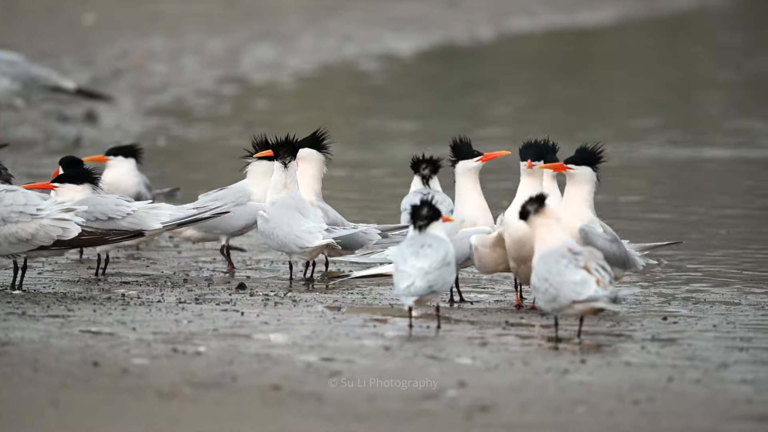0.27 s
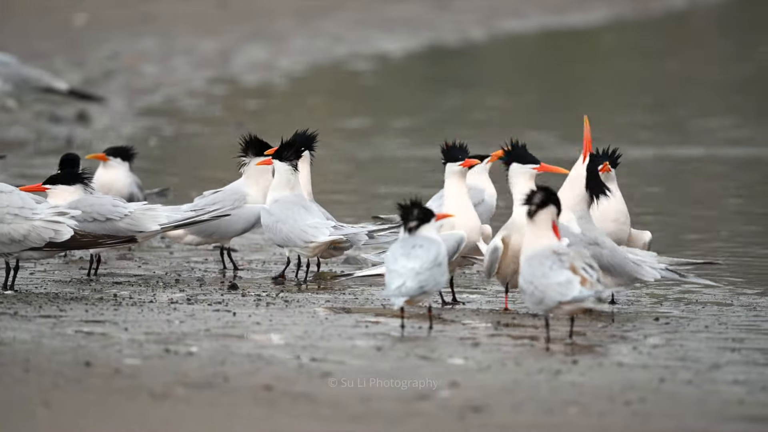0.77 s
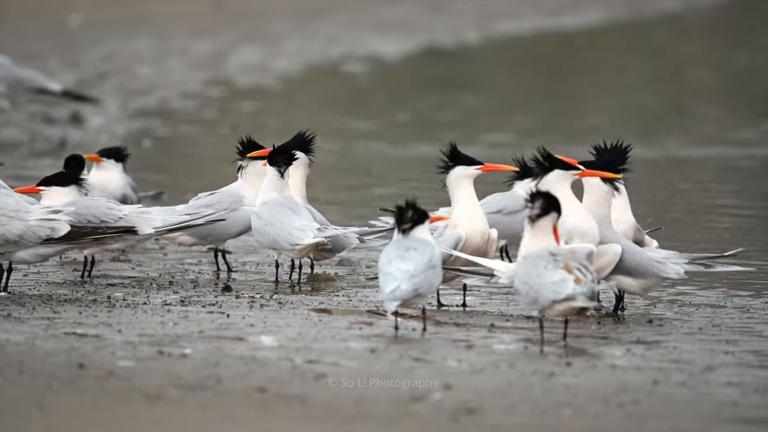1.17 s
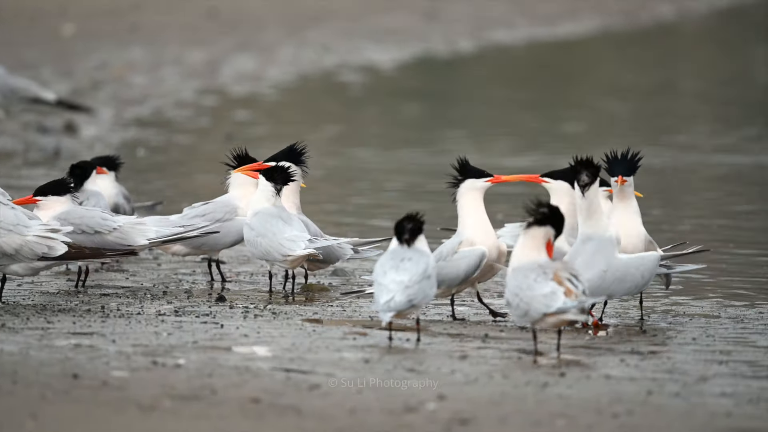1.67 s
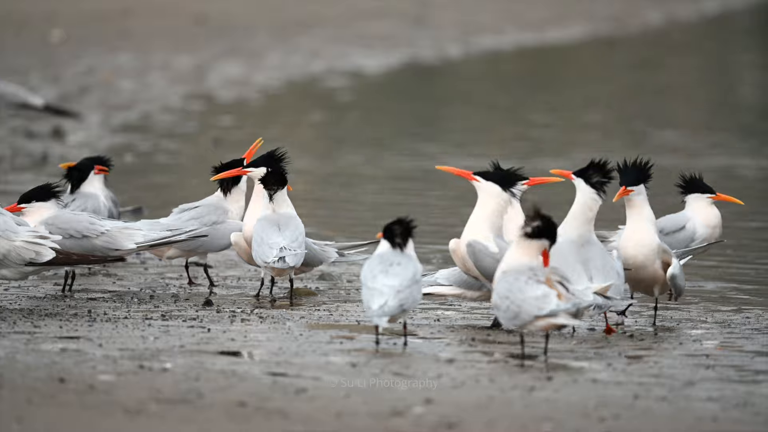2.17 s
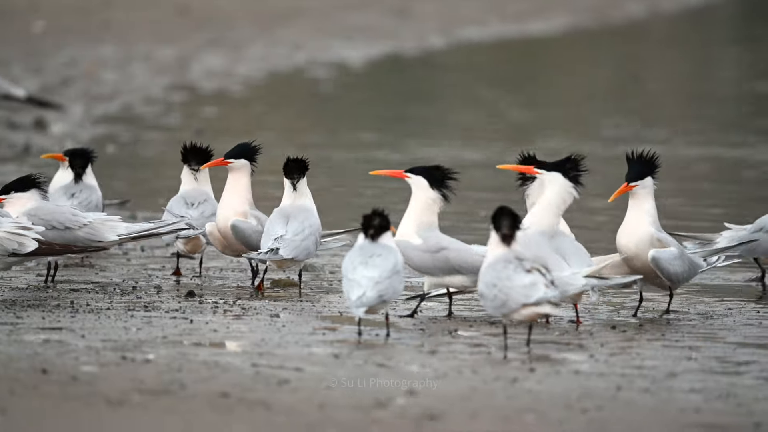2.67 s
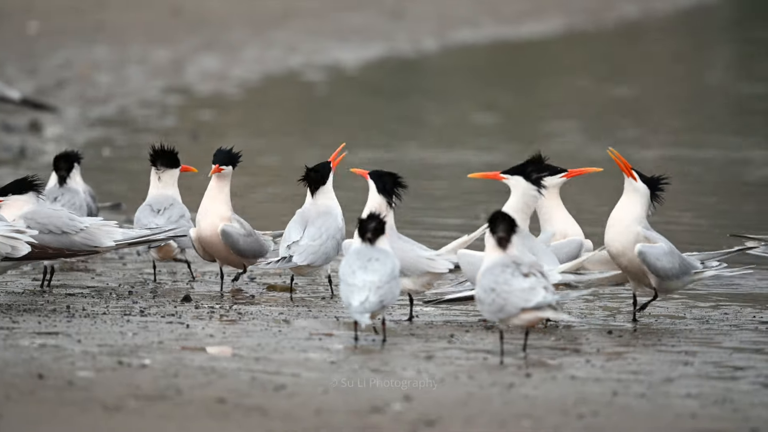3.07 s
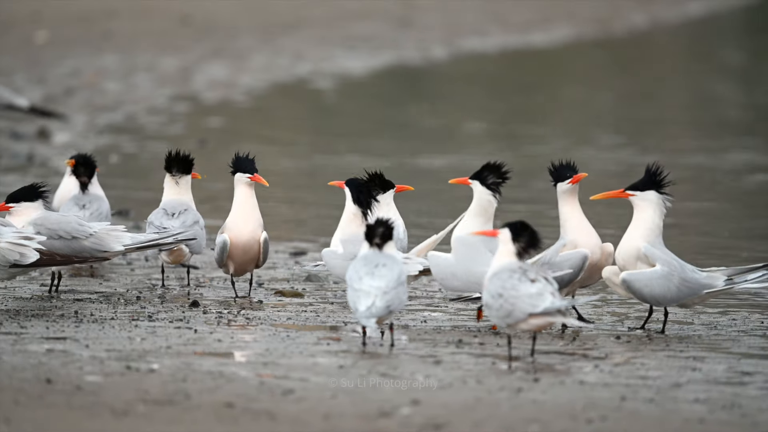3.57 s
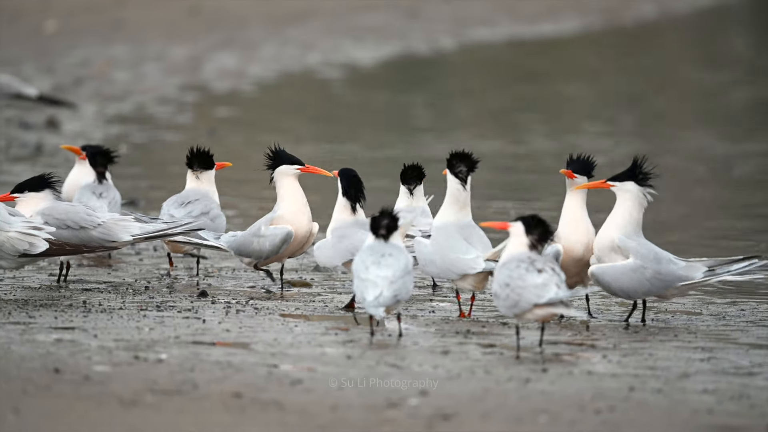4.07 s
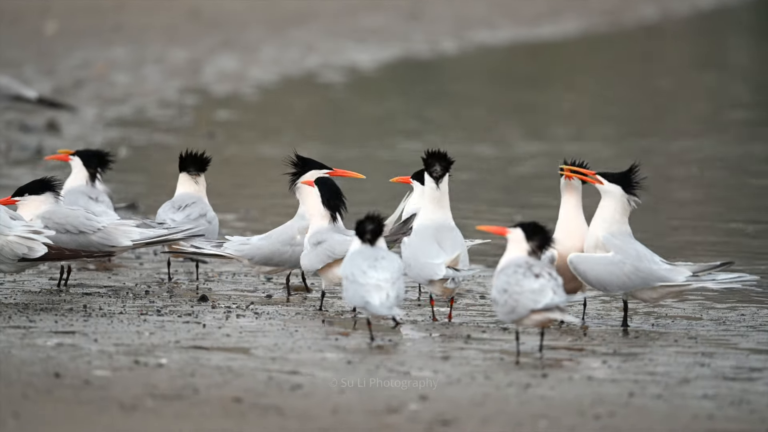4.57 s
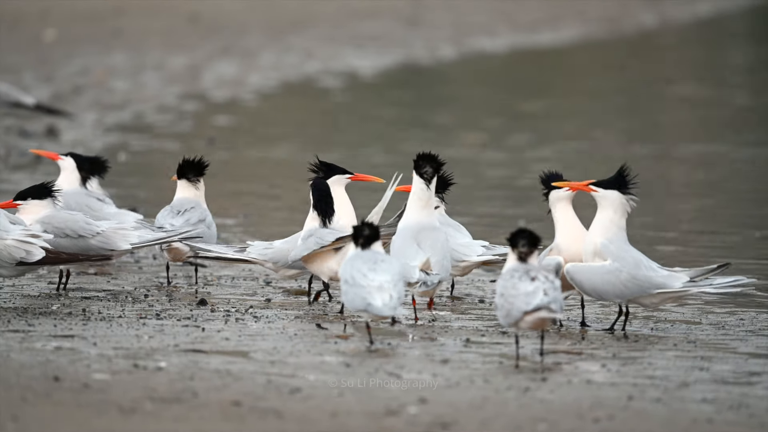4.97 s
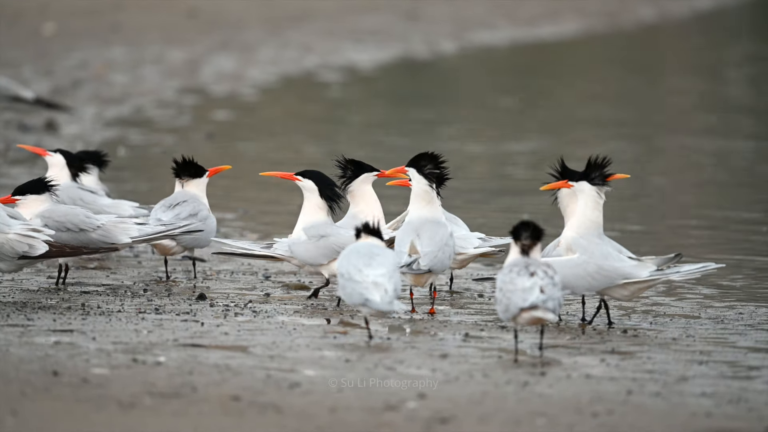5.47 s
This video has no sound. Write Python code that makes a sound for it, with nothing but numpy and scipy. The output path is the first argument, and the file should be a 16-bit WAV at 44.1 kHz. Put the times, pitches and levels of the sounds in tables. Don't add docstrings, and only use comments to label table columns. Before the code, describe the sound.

A flock of terns on an open mud flat calls in overlapping reedy notes and fast grating rattles, over faint surf and light wind.

```python
import sys
import numpy as np
from scipy import signal
from scipy.fft import rfft, irfft, next_fast_len
from scipy.io import wavfile
from scipy.ndimage import uniform_filter1d, map_coordinates

SR = 44100
rng = np.random.default_rng(int(sys.argv[2]) if len(sys.argv) > 2 else 0)


def dump(signal):
    limited = np.clip(np.atleast_2d(signal).T, -1, 1)
    pcm = np.round(limited * 32767).astype(np.int16)
    wavfile.write(sys.argv[1], SR, pcm)


def gain_from_db(level_db):
    decades = np.asarray(level_db, float) / 20
    return 10 ** decades


N = 252252


def unit(x):
    return x / np.sqrt(np.mean(x ** 2) + 1e-20)


def along(points, hz):
    f, v = np.transpose(points)
    return np.interp(np.log(hz + 1), np.log(f + 1), v)


def wobble(rate_hz, size=N):
    knots = rng.standard_normal(int(size * rate_hz / SR) + 4)
    return map_coordinates(knots, [np.arange(size) * rate_hz / SR])


def filtered(x, response):
    m = next_fast_len(N + 8192)
    return irfft(rfft(x, m) * response(np.fft.rfftfreq(m, 1 / SR)), m)[..., :N]


def coloured(spectrum):
    return unit(filtered(rng.standard_normal(N), lambda hz: gain_from_db(along(spectrum, hz))))


def add(track, start_s, sound):
    part = track[round(start_s * SR):][:len(sound)]
    part += sound[:len(part)]


def swell(t, length_s, rise_s, fall_s):
    nearest_end = np.minimum(t / rise_s, (length_s - t) / fall_s)
    return np.sin(np.pi / 2 * np.clip(nearest_end, 0, 1)) ** 2


# Hz, left minus right in dB.
SHADE_DB = [(700, 1.5), (1400, 0.5), (2700, 1.5), (3400, -9), (4100, -8), (5000, -3.5), (6900, 5.5),
            (9500, 0.5)]
# Hz, left lead in radians.
TURN_RAD = [(700, 0), (1400, -.5), (2200, -.9), (3400, -1.9), (4100, .4), (6000, .2), (9000, -.3),
            (13000, .5)]


def ports(x, lead_ms):
    def half(hz):
        phase = along(TURN_RAD, hz) - 2 * np.pi * hz * lead_ms / 1000
        return gain_from_db(along(SHADE_DB, hz) / 2) * np.exp(.5j * phase)
    return filtered(x, lambda hz: np.array([half(hz), 1 / half(hz)]))


def syrinx(pitch_hz, tones_db, loss_db, jitter, flutter_db):
    k = np.arange(1, 17)[:, None]
    kin = np.where(k < 8, k, 6 + k % 2)
    level = np.take(tones_db, kin - 1) - loss_db * (k - kin)
    hz = pitch_hz * (1 + jitter * wobble(406, size=len(pitch_hz)))
    slack_db = 2
    level = level - slack_db * k * (1 - pitch_hz / pitch_hz.max())
    phase = 2 * np.pi * np.cumsum(hz) / SR
    drift = wobble(89.75, size=k.size * len(hz)).reshape(k.size, -1)
    flutter = flutter_db * np.minimum(k / 5, 1.2) * drift
    scatter_db = rng.normal(0, .3 + k ** 2 / 40)
    each = gain_from_db(level + scatter_db + flutter) * (k * hz < 15800)
    return np.sqrt(2) * (each * np.sin(k * phase + k * k)).sum(0)


# Hz, dB.
BEAK_DB = [(5200, 0.74), (6100, -6.5), (8500, -7), (15500, -13)]
# centre in Hz, width in Hz, gain in dB.
THROAT_PEAKS = [(2180, 395, 3.5), (4750, 230, 2.5)]


def throat_and_air(calls):
    def gain_db(hz):
        peaks = sum(db * np.exp(-((hz - c) / w) ** 2) for c, w, db in THROAT_PEAKS)
        return along(BEAK_DB, hz) + peaks - 3
    return filtered(calls, lambda hz: gain_from_db(gain_db(hz)))


# Hz, level in dB per Hz.
SURF_DB = [(120, -12), (200, -7), (322, -5), (394, -13), (601, -14.5), (696, -19), (763, -17.5), (933, -15),
           (1350, -25.5), (2960, -35.5), (16000, -63.5)]
# Hz, correlation from -1 to 1.
SURF_LIKENESS = [(200, 1), (700, 0.83), (2000, 0.25), (3000, -0.79), (8000, -0.31)]


def surf():
    z = signal.stft(rng.standard_normal((2, N)), nperseg=512)[2]
    field = uniform_filter1d(rng.standard_normal(z.shape[1:]), size=6, axis=0)
    field = uniform_filter1d(field, size=14, axis=1)
    pair = signal.istft(z * gain_from_db(1.2 * unit(field)), nperseg=512)[1][:, :N]

    def mid_side(hz):
        turn = np.arccos(np.clip(along(SURF_LIKENESS, hz), -1, 1)) / 2
        return gain_from_db(along(SURF_DB, hz)) * (hz > 150) * [np.cos(turn), np.sin(turn)]
    mid, side = filtered(pair, mid_side)
    return unit(np.array([mid + side, mid - side]))


# Hz, level in dB per Hz.
BUFFET_DB = [(12, -63), (20, -6), (65, 6), (128, 6.5), (296, -7), (431, -15), (500, -51), (650, -32),
             (1100, -120)]
# start in seconds, peak in dB.
WIND_PUFFS = [(0.38, -21), (3.944, -21.5), (4.057, -17.5), (4.144, -17), (4.158, -22), (4.212, -14.5),
              (4.893, -15), (5.471, -15), (5.631, -9)]


def wind():
    left = unit(coloured(BUFFET_DB) * gain_from_db(1.68 * wobble(25.068)))
    u = np.arange(-400, 400) / SR / .0016
    pulse = (1 - u * u) * np.exp(-u * u / 2)
    for start_s, db in WIND_PUFFS:
        add(left, start_s, -gain_from_db(db + 32.5) * pulse)
    right = gain_from_db(-8.5) * unit(coloured(BUFFET_DB) * gain_from_db(2.4 * wobble(26.0))) + 0.11 * left
    return np.array([left, right])


# time in seconds, buffet in dB, surf in dB.
WEATHER = [
    (0.0, -25, -39),
    (0.29, -31.5, -40),
    (3.6, -34, -42),
    (4.17, -30.5, -43),
    (4.83, -38, -42),
    (4.87, -32.5, -43),
    (5.72, -39, -42),
]


def air():
    s, buffet_db, surf_db = np.transpose(WEATHER)
    t = np.arange(N) / SR
    return gain_from_db(np.interp(t, s, surf_db) + 4.5) * surf() + gain_from_db(np.interp(t, s, buffet_db) + 2.5) * wind()


# Hz, level in dB per Hz.
BREATH_DB = [(3000, -25), (6800, -14), (8400, 4), (9600, -7), (11000, -12), (16000, -33)]
# Hz, level in dB per Hz.
TOP_AIR_DB = [(6000, -27), (10000, -2.5), (13000, -3), (16000, -9)]
# crest in dB, top air in dB, list of puff starts in seconds.
HISS_RUNS = [
    (-45.5, -2, [0.002, 0.017, 0.085, 0.1]),
    (-43.5, -2, [0.632, 0.661, 0.684, 0.706, 0.724, 0.742, 0.757, 0.771, 0.785, 0.802, 0.818, 0.836, 0.854, 0.872]),
    (-51, -3.5, [3.184, 3.213, 3.236, 3.256, 3.277, 3.298, 3.319, 3.339, 3.358, 3.376, 3.393, 3.41, 3.428]),
    (-51, -7, [4.737, 4.763, 4.787, 4.808, 4.826, 4.845, 4.862, 4.879, 4.896, 4.914, 4.931, 4.949, 4.969]),
]


def hiss():
    puff_s, crest_share, rise_db = 0.015, 0.35, 1.5
    out, t = np.zeros(N), np.arange(round(puff_s * SR)) / SR
    breath, top = coloured(BREATH_DB), coloured(TOP_AIR_DB)
    for db, top_db, starts in HISS_RUNS:
        air_now = gain_from_db(-4.5) * breath + gain_from_db(top_db) * top
        for s, u in zip(starts, np.linspace(0, 1, len(starts))):
            level = db - rise_db * abs(u - crest_share) / crest_share + rng.normal(0, 2.6)
            puff = swell(t, puff_s, rise_s=0.0027, fall_s=0.0087) * air_now[round(s * SR):][:len(t)]
            add(out, max(s - .001, 0), gain_from_db(level) * puff)
    return ports(out, lead_ms=0.023)


# Hz, dB.
RASP_DB = [(600, -38), (1500, 2), (2200, 10.5), (3200, -6.5), (4400, 5.5), (6500, -8), (12000, -17),
           (16000, -58)]


def rattles(chips, length_s):
    out, rasp = np.zeros(N), coloured(RASP_DB)
    t = np.arange(round((length_s + .004) * SR)) / SR
    base_db = np.array([-13, -1.0, -11.5, -7, -17.5, -23.0, -36])
    upper_share = np.array([0.15, 0.27, 0.53, 1.0, 0.86, 1.0, 0.35])
    for s, hz, db, upper_db in chips:
        path = hz * (.97 + 0.055 * t / t[-1])
        voice = syrinx(path, base_db + upper_db * upper_share, loss_db=1.5, jitter=0.024, flutter_db=3.0)
        breath = gain_from_db(-9 + .4 * upper_db) * rasp[round(s * SR):][:len(t)]
        shape = swell(t, t[-1], rise_s=0.0018, fall_s=0.005)
        add(out, max(s - .0015, 0), gain_from_db(db) * shape * (voice + breath))
    return ports(out, lead_ms=0.0038)


def trains(rows, ones, bill):
    length_s, upper_db, loss_db = bill
    quicken = 0.84
    climb, uneven_db, uneven_pitch = 0.012, 2.5, 0.017
    chips = []
    for first, last, n, hz, db in rows:
        for k in range(round(n)):
            s = first + (last - first) * (k / (round(n) - 1)) ** quicken
            chips.append((s, hz * (1 + climb * k), db - loss_db * k))
    chips += ones
    luck = rng.standard_normal((len(chips), 2))
    return rattles([(s, hz * (1 + uneven_pitch * higher), db + uneven_db * louder, upper_db)
                    for (s, hz, db), (louder, higher) in zip(chips, luck)], length_s)


# first chip in s, last chip in s, chip count, pitch in Hz, first chip in dB.
DULL_TRAINS = [(0.002, 0.015, 3, 1272, -30), (1.1064, 1.1424, 3, 1010, -28), (1.1765, 1.189, 2, 935, -27),
               (1.512, 1.5294, 2, 966, -25.5)]
# first chip in s, last chip in s, chip count, pitch in Hz, first chip in dB.
SHARP_TRAINS = [(0.3347, 0.352, 2, 1400, -45.5), (0.387, 0.406, 2, 1430, -43.5),
                (0.43, 0.451, 2, 1250, -40), (0.5055, 0.526, 2, 1265, -45), (0.866, 0.8834, 2, 1364, -31),
                (2.455, 2.472, 2, 1077, -32.5)]
# start in seconds, pitch in Hz, level in dB.
DULL_CHIPS = [(0.554, 1300, -51), (1.988, 916, -38), (3.991, 998, -33), (5.164, 1090, -39.5),
              (5.395, 833, -33.5)]
SHARP_CHIPS = [(0.11, 1440, -37), (4.233, 940, -36.5), (2.084, 2200, -33)]
# chip length in seconds, upper overtones in dB, loss per chip in dB.
CLOSED_BILL = (0.0097, -16.5, 0.64)
OPEN_BILL = (0.01, -0.47, 0.42)


def bill_rattles():
    return trains(SHARP_TRAINS, SHARP_CHIPS, OPEN_BILL) + trains(DULL_TRAINS, DULL_CHIPS, CLOSED_BILL)


def mudflat(x):
    t = np.arange(SR // 5) / SR
    tail = rng.standard_normal((2, len(t))) * gain_from_db(-60 * t / .09) * (t > .002)
    return signal.fftconvolve(x, tail / np.linalg.norm(tail[0]), axes=1)[:, :N]


def notes(rows, tone, crest_share):
    tones_db, loss_db, lead_ms, burr_db = tone
    out, rasp = np.zeros(N), coloured(RASP_DB)
    for start, end, crest_hz, droop, db in rows:
        t = np.arange(round((end - start + 0.0032) * SR)) / SR
        burr = np.cos(2 * np.pi * 62 * t - 2.5) * rng.uniform(0.42, 0.9)
        off_crest_s = t - .002 - crest_share * (end - start)
        arch = np.clip(1 - droop * (off_crest_s / .035) ** 2, .5, 1)
        path = crest_hz * arch * (1 + .004 * burr_db * burr)
        voice = syrinx(path, tones_db, loss_db, jitter=0.013, flutter_db=4.5)
        voice += gain_from_db(-24 + 2.6 * burr_db) * rasp[round(start * SR):][:len(t)]
        shape = swell(t, t[-1], rise_s=0.0031, fall_s=0.0062)
        add(out, start - .002, gain_from_db(db + burr_db * burr) * shape * voice)
    return ports(out, lead_ms)


# start in s, end in s, crest in Hz, droop 35 ms off the crest as a share, second overtone in dB.
BRIGHT_NOTES = [(0.03, 0.085, 1007, 0.16, -45), (0.115, 0.16, 1290, 0.38, -55),
                (0.22, 0.285, 1000, 0.22, -44.5), (0.99, 1.06, 985, 0.069, -46.5),
                (3.53, 3.61, 987, 0.1, -48), (5.36, 5.425, 1003, 0.26, -45.5)]
SHRILL_NOTES = [(0.035, 0.085, 1487, 0.153, -42.5), (5.095, 5.158, 1320, 0.2, -43.5),
                (5.622, 5.682, 1253, 0.22, -44.5)]
BURRY_NOTES = [(0.742, 0.795, 1085, 0.045, -29.5), (2.98, 3.045, 1197, 0.101, -36),
               (5.346, 5.387, 1086, 0.26, -34.5)]
BURRY_FALLS = [(0.083, 0.108, 1074, 0.098, -35.5)]
NASAL_NOTES = [(0.14, 0.2, 1460, 0.087, -56), (0.465, 0.505, 1390, 0.36, -46.5),
               (0.8, 0.85, 1370, 0.29, -34.5), (1.705, 1.775, 1141, 0.13, -43.5),
               (2.122, 2.168, 1463, 0.24, -38.5), (2.025, 2.065, 1170, 0.2, -41),
               (3.868, 3.956, 1256, 0.13, -30), (2.192, 2.243, 1219, 0.203, -32),
               (2.76, 2.83, 922, 0.15, -47), (3.445, 3.505, 1132, 0.21, -41.5),
               (3.64, 3.68, 1060, 0.19, -51), (3.675, 3.735, 1140, 0.38, -42.5),
               (3.802, 3.858, 1276, 0.28, -29.5), (3.93, 3.98, 1091, 0.203, -31),
               (4.035, 4.09, 1240, 0.24, -56.5), (4.29, 4.35, 1110, 0.17, -58),
               (4.6, 4.65, 1073, 0.31, -49.5), (5.22, 5.273, 1302, 0.3, -30),
               (5.303, 5.32, 1058, 0.13, -26), (5.655, 5.71, 977, 0.26, -50)]
NASAL_EARLIES = [(2.335, 2.372, 1135, 0.3, -31), (4.842, 4.895, 1072, 0.045, -30),
                 (3.33, 3.354, 1083, 0.05, -29.5)]
NASAL_RISES = [(0.57, 0.587, 1202, 0.4, -32.5), (1.15, 1.2, 1166, 0.2, -47.5),
               (1.345, 1.36, 1170, 1.1, -34), (2.005, 2.014, 1206, 2.2, -27),
               (3.769, 3.778, 1290, 2.7, -29), (3.781, 3.792, 1340, 1.9, -26), (2.7, 2.75, 907, 0.062, -44),
               (4.674, 4.689, 1146, 0.3, -33), (5.275, 5.289, 1118, 0.48, -29)]
NASAL_FALLS = [(1.245, 1.27, 1325, 0.024, -44), (2.675, 2.7, 1118, 0.089, -29)]
PURE_NOTES = [(0.79, 0.855, 1233, 0.21, -28), (1.2, 1.255, 1075, 0.27, -31), (1.46, 1.505, 1460, 0.33, -39),
              (3.125, 3.171, 1160, 0.203, -26), (3.277, 3.318, 1085, 0.23, -25.5)]
PURE_EARLIES = [(1.362, 1.412, 1250, 0.25, -29), (2.023, 2.071, 1280, 0.23, -25),
                (2.468, 2.54, 1260, 0.099, -24.5)]
PURE_FALLS = [(0.592, 0.622, 1200, 0.126, -24.5), (2.557, 2.585, 1147, 0.14, -21),
              (2.598, 2.62, 1084, 0.08, -22.5), (4.693, 4.727, 1175, 0.086, -27)]
REEDY_NOTES = [(0.62, 0.66, 975, 0.47, -35), (0.9, 0.965, 1068, 0.18, -33), (1.05, 1.1, 1199, 0.1, -33.5),
               (1.775, 1.83, 1460, 0.11, -59), (1.93, 1.99, 1210, 0.28, -53.5),
               (3.06, 3.09, 1207, 0.27, -47), (3.4, 3.45, 954, 0.087, -38.5),
               (3.43, 3.5, 1117, 0.31, -37.5), (3.787, 3.828, 1391, 0.094, -33),
               (4.45, 4.505, 1248, 0.46, -48.5), (4.46, 4.53, 1072, 0.16, -45.5),
               (4.55, 4.605, 1068, 0.074, -42.5), (4.57, 4.61, 1276, 0.22, -50),
               (5.185, 5.27, 1013, 0.11, -43), (5.228, 5.266, 1309, 0.267, -41.5)]
PIERCING_NOTES = [(2.635, 2.675, 1665, 0.11, -35.5)]
PIERCING_EARLIES = [(4.251, 4.293, 1093, 0.23, -42.5)]
# overtones 1-7 in dB, loss per further overtone in dB, right-port lead in ms, burr depth in dB.
BRIGHT_THROAT = ([8.5, 6, 0.5, -12, -11.5, -17, -18.5], 0.31, 0.012, 0.53)
SHRILL_THROAT = ([-10, 1, -9, -3.5, -17, -14, -8], 0.4, 0.023, 0.6)
BURRY_THROAT = ([-20.5, 2, -8.5, -5, -15.5, -28.5, -36], 0.89, 0.023, 7.1)
NASAL_THROAT = ([-13, 1.5, -5.5, -7, -19.5, -22.5, -30], 2.3, 0.023, 1)
PURE_THROAT = ([-47, -0.5, -32.5, -7, -28.5, -22, -30], 2.7, -0.023, 0.48)
REEDY_THROAT = ([-3, -2, -4.5, -8.5, -10, -19, -20], 0.73, 0.031, 1)
PIERCING_THROAT = ([-38, 1, -26, 0, -30, -12.5, -26], 0.55, -0.026, 0.6)


def arched_notes():
    arch, early, rising, falling = 0.48, 0.32, 0.89, -0.2
    parts = [(BRIGHT_NOTES, BRIGHT_THROAT, arch), (SHRILL_NOTES, SHRILL_THROAT, arch),
             (BURRY_NOTES, BURRY_THROAT, arch), (BURRY_FALLS, BURRY_THROAT, falling),
             (NASAL_NOTES, NASAL_THROAT, arch), (NASAL_EARLIES, NASAL_THROAT, early),
             (NASAL_RISES, NASAL_THROAT, rising), (NASAL_FALLS, NASAL_THROAT, falling),
             (PURE_NOTES, PURE_THROAT, arch), (PURE_EARLIES, PURE_THROAT, early),
             (PURE_FALLS, PURE_THROAT, falling), (REEDY_NOTES, REEDY_THROAT, arch),
             (PIERCING_NOTES, PIERCING_THROAT, arch), (PIERCING_EARLIES, PIERCING_THROAT, early)]
    return sum(notes(rows, tone, crest_share) for rows, tone, crest_share in parts)


# start in seconds, peak in dB,
# second overtone in Hz, upper overtones in dB.
NEAR_CHIPS = [(0.634, -21, 1990, -19), (0.641, -26, 2140, 1), (0.6607, -21, 2154, -1),
              (0.6838, -19.5, 1820, -2), (0.705, -20.5, 2120, -1), (0.7253, -20, 2180, 1),
              (0.7845, -14.5, 2152, -1), (0.8014, -24, 2190, 8), (0.8178, -22, 2100, -10),
              (0.8344, -19.5, 2206, 0), (0.9612, -25.5, 2100, 5), (0.9802, -26.5, 2150, 5.5),
              (2.0938, -21, 2090, -12), (2.1074, -18, 1920, -21), (2.169, -23.5, 2060, 2),
              (2.1905, -23, 2090, 0), (2.2466, -19, 2150, 1), (2.2723, -14, 2066, -5),
              (2.293, -15.5, 1954, -15), (2.3166, -17, 2220, -6.5),
              (3.056, -19.5, 2120, -9), (3.0874, -20.5, 1940, -12), (3.1082, -15.5, 1924, -16),
               (3.1454, -17, 2277, -2), (3.1714, -26, 2180, 3), (3.1846, -13, 1930, -13),
               (3.2048, -26, 1920, -12), (3.2126, -15, 2100, -12), (3.2364, -17, 2160, -12),
               (3.258, -15, 2120, -12), (3.3184, -16, 2113, -2), (3.3581, -20, 1970, 1),
               (3.3762, -21.5, 1970, 1), (3.3943, -22, 1930, -1), (3.4094, -29, 1840, -10),
               (3.4281, -22.5, 1785, -3), (3.8504, -17, 2223, -12), (3.8591, -17, 2180, -3),
               (3.8824, -15, 2120, -5), (3.9044, -20.5, 2080, -8), (3.924, -20.5, 2125, -2),
               (4.7385, -18.5, 1940, -8), (4.7636, -16, 1780, -14), (4.787, -17.5, 2080, -12),
               (4.807, -18.5, 2074, -10), (4.8246, -21.5, 2106, -6), (4.8954, -20.5, 1950, -3),
               (4.9153, -22, 1955, -10), (4.933, -24, 1885, -7), (4.9484, -29, 1820, -8),
               (4.9706, -32, 1870, -12), (4.9894, -42, 1900, -12), (5.3224, -22, 2060, -11)]
NEAR_CLIPPED = [(1.1872, -18.5, 1914, -8.5), (2.469, -24, 2550, -9), (2.5985, -15.5, 2100, -4),
                (2.6753, -20.5, 2166, 2), (2.9308, -21.5, 2300, -4), (2.948, -21, 2400, -2),
                (2.9652, -21.5, 2370, 1), (3.759, -25.5, 2330, -1), (5.22, -21, 2180, -3)]


def near_rattles():
    out = 0
    for rows, length_s, voice_db in [(NEAR_CHIPS, 0.009, -7), (NEAR_CLIPPED, 0.0052, -9)]:
        chips = [(s, hz / 2, db + voice_db, upper_db) for s, db, hz, upper_db in rows]
        out = out + rattles(chips, length_s)
    return out


# start in seconds, end in seconds, chips a second, first chip in dB, last chip in dB.
FAR_TRAINS = [(0.66, 0.868, 59, -39, -44), (1.419, 1.5, 49, -39.5, -46), (1.554, 1.78, 51.5, -45, -52.5),
              (2.205, 2.614, 51.6, -39, -49), (3.066, 3.453, 55.5, -43, -42.5),
              (3.868, 4.006, 59, -44, -48), (4.745, 4.841, 48.3, -39, -38),
              (4.895, 4.984, 56.7, -41.5, -47)]
# centre in Hz, width in Hz, level in dB.
FAR_PEAKS = [(954, 180, 3), (1518, 210, 1), (2100, 1340, 2), (4170, 2700, -22.5), (8000, 6700, -32)]


def far_rattles():
    gate, t = np.zeros(N), np.arange(700) / SR
    chip = swell(t, 0.014, rise_s=0.003, fall_s=0.0075)
    for start, end, rate_hz, first_db, last_db in FAR_TRAINS:
        for s in np.arange(start, end, 1 / rate_hz):
            db = np.interp(s, [start, end], [first_db, last_db]) + rng.normal(0, 0.68)
            add(gate, s, gain_from_db(db + 9.0) * chip)
    throat = lambda f: sum(gain_from_db(db) / (1 + ((f - c) / w * 2) ** 4) for c, w, db in FAR_PEAKS)
    return ports(gate * unit(filtered(rng.standard_normal(N), throat)), lead_ms=0.03)


# start in seconds, peak in dB, ring in Hz.
MUD_TICKS = [(1.1315, -31, 4040), (1.8878, -40, 4310), (1.898, -48, 4370), (1.911, -30, 7270),
             (2.7324, -42, 5500), (2.827, -34, 4660), (2.839, -48, 9000), (2.864, -45, 9500),
             (2.916, -50, 3500), (4.6583, -47, 4510), (5.2044, -51, 4390), (5.475, -57, 4460)]


def mud_ticks():
    out, t = np.zeros(N), np.arange(900) / SR
    for s, db, hz in MUD_TICKS:
        body = rng.standard_normal(len(t)) * 1.17 + 1.3 * np.sin(2 * np.pi * hz * t)
        add(out, s, gain_from_db(db - 9.5 - 60 * t / 0.011) * body)
    return ports(out, lead_ms=0.023)


# time in seconds, level in dB.
WING_FLAP = [
    [(1.19, -66), (1.21, -52), (1.26, -50), (1.298, -47), (1.33, -57), (1.37, -70)],
]


def wing_rustle():
    s, db = np.transpose(WING_FLAP[0])
    level_db = np.interp(np.arange(N) / SR, s, db, left=-120, right=-120)
    feathers = coloured([(3000, -32.0), (6500, -9), (12500, -7.0), (16000, -18)])
    return ports(gain_from_db(level_db - 6 + 4 * wobble(250)) * feathers, lead_ms=0.023)


# start in seconds, peak in dB, ring in Hz.
BILL_CLAPS = [
    (1.201, -11, 1830),
    (1.299, -21.5, 950),
    (1.338, -15, 1000),
    (1.501, -16.5, 850),
]


def bill_claps():
    out, t = np.zeros(N), np.arange(900) / SR
    for s, db, hz in BILL_CLAPS:
        ring = gain_from_db(db + 1.5 - 60 * t / .0065) * np.sin(2 * np.pi * hz * t)
        click = gain_from_db(db - 31 - 60 * t / .004) * rng.standard_normal(len(t))
        add(out, s, ring + click)
    return ports(out, lead_ms=0.023)


def scene():
    weather = air()
    birds = hiss() + throat_and_air(bill_rattles() + arched_notes() + near_rattles())
    birds += far_rattles() + mud_ticks() + wing_rustle() + bill_claps()
    return birds + gain_from_db(-14) * mudflat(birds) + weather


def low_pass(x):
    return signal.sosfilt(signal.butter(12, 16460, fs=SR, output="sos"), x)


def record(dry):
    mix = filtered(dry, lambda hz: gain_from_db(-40 * (hz > 15830)))
    return low_pass(mix)


dry = scene()
out = record(dry)
dump(out)
```